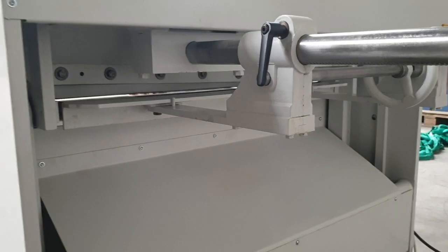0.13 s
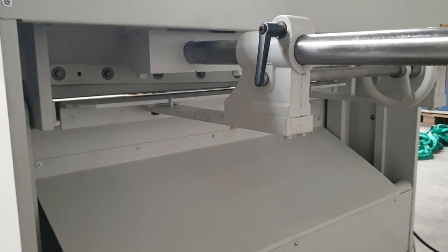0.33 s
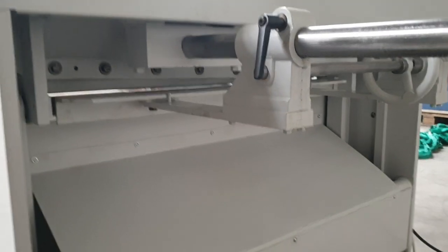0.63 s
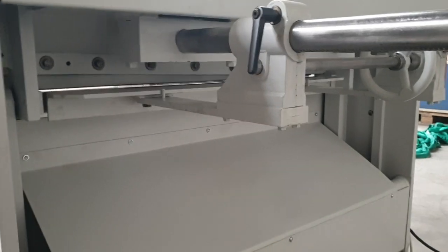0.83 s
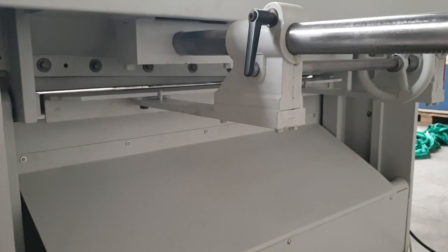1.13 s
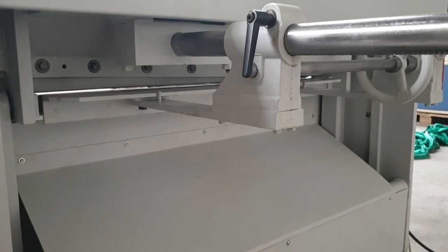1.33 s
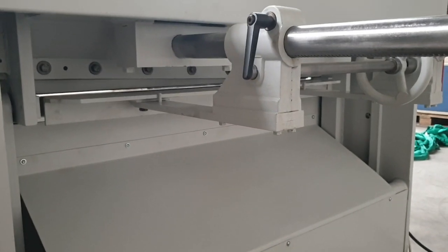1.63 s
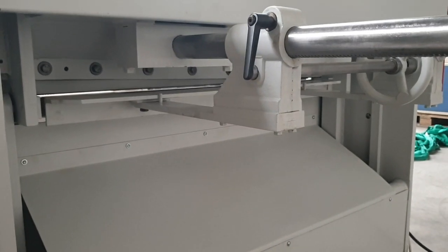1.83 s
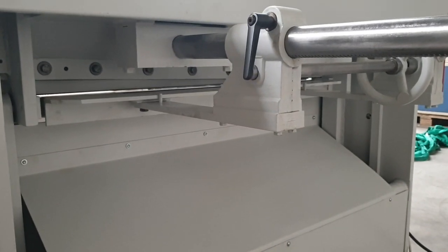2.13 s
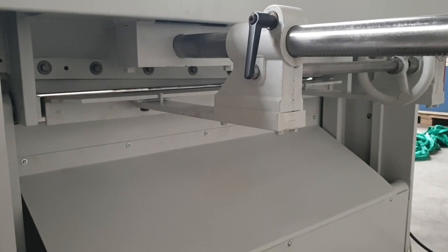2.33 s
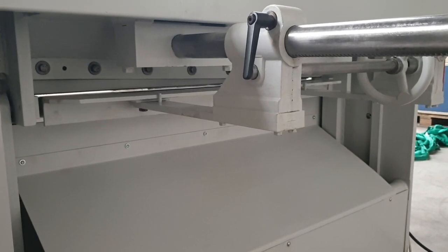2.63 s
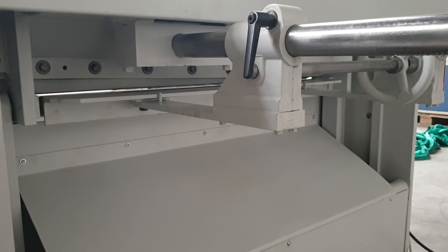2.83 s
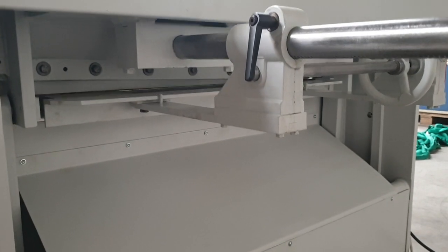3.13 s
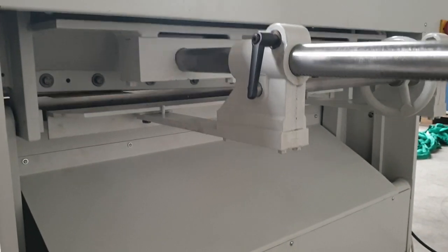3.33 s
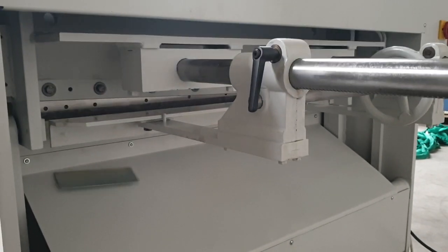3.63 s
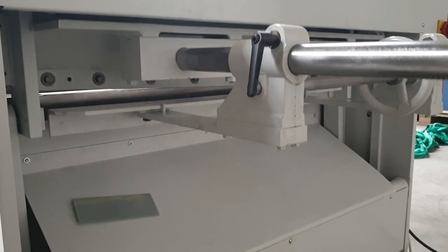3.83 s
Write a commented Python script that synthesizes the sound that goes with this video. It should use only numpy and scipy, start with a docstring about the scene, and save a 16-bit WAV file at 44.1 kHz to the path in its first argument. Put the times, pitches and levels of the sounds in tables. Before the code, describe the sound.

A metal shear idles with a low rumble and wavering hum in a workshop, clicks faintly, then cuts with a loud bang and heavy thuds; a steel strip clatters and slides on the chute, heard close in stereo.

```python
"""Sheet metal shear cutting a strip

A metal shear idles in a workshop, clicks, then cuts with a sharp bang of noise and low frame thuds.
The strip drops on the chute and bounces: decaying tones for its ring, noise for its clash; then it slides.
The microphone is close. The bang and the strip have most of their top treble on the left."""
import sys
import numpy as np
from scipy import signal
from scipy.fft import rfft, irfft
from scipy.io import wavfile

SR = 44100
rng = np.random.default_rng(int(sys.argv[2]) if len(sys.argv) > 2 else 0)


def to_wav(s):
    """Save 16-bit WAV."""
    ch = np.atleast_2d(s).T  # columns
    pcm = np.round(np.clip(ch, -1, 1) * 32767)  # PCM
    wavfile.write(sys.argv[1], SR, pcm.astype(np.int16))


N = 176400  # length of the scene in samples
T = np.arange(SR) / SR  # one second of time, for the single sounds

# Where each pitch sits between the sides. Each row: pitch in Hz, left minus right in dB.
PAN = [(80, 0), (1000, -4), (2000, -7.5), (4000, -4.5), (5500, -2), (7000, 18.5), (11000, 20), (13000, 0.5),
       (15000, 20)]
# Tone of metal touching metal. Each row: pitch in Hz, clash in dB per Hz, chute in dB per Hz.
CONTACT = [(100, -49, -21.5), (587, 0.5, 0), (1060, -20, -9), (1330, -22, 0), (1990, 2, 1.5),
           (3130, -2, -3), (5200, 4, -8.5), (7530, -9, -21), (9970, 1, -24), (13400, -2, -42),
           (16600, -23, -48)]
# t60 is the time in which a sound fades by 60 dB.
CLASH_T60_S = 0.2
MODE_GAP_HZ = 110.8  # average spacing of the strip's weaker modes; the chute's lie twice as close


def amp(db):
    """Turns decibels into a gain."""
    return 10 ** (np.asarray(db) / 20)


def unit(x):
    """Scales a signal to an rms of 1."""
    return x / np.sqrt(np.mean(x ** 2) + 1e-20)


def read(table, hz, axis=1):
    """Reads one column of a table between its rows, along log frequency."""
    table = np.array(table)
    return np.interp(np.log(hz + 1), np.log(table[:, 0] + 1), table[:, axis])


def sides(pan_db):
    """Gives the left and right gains for a left minus right difference in dB."""
    return amp(np.array([pan_db, -pan_db]).reshape(2, -1) / 2)


def fade(t60):
    """One second of exponential decay, as of a freely ringing body."""
    return np.exp(-np.log(1000) * T / t60)


def swell(peak_s):
    """A rounded rise to 1 and a longer fall, as of a heavy body pushed into motion."""
    return T / peak_s * np.exp(1 - T / peak_s)


def add(mix, s, sound):
    """Mixes a sound in at a time in seconds."""
    part = mix[:, round(s * SR):][:, :sound.shape[-1]]
    part += sound[..., :part.shape[1]]


def colour(x, table, axis=1, pan=PAN):
    """Gives two unrelated signals a spectrum, rms 1, then places each pitch between the sides."""
    # Likeness of the two sides. Each row: pitch in Hz, likeness from 0 to 1.
    likeness = [(100, 0.86), (500, 0.83), (1500, 0)]
    hz = np.fft.rfftfreq(x.shape[1], 1 / SR)
    a, b = rfft(x)
    same = np.clip(read(likeness, hz), 0, 1)
    pair = np.array([a, same * a + np.sqrt(1 - same ** 2) * b])
    shaped = pair * amp(read(table, hz, axis))
    return irfft(shaped * sides(read(pan, hz))) / irfft(shaped).std()


def noise(table, axis=1):
    """One second of coloured noise, like countless overlapping modes."""
    return colour(rng.standard_normal((2, SR)), table, axis)


def narrow(hz, width_hz):
    """A wavering band of noise around one pitch; around 0 Hz it is a random wobble."""
    f = np.fft.rfftfreq(N, 1 / SR)
    band = 1 / (1 + (2 * (f - hz) / width_hz) ** 4)
    return unit(irfft(rfft(rng.standard_normal(N)) * band, N))


def weak_modes(present, axis):
    """The many weaker modes of a plate: scattered pitches driven unevenly, anew each time."""
    spread_db = 4
    push = amp(spread_db * rng.standard_normal(len(present)))
    push = push * np.exp(2j * np.pi * rng.random((2, len(present))))
    return colour(irfft(present * push, SR), CONTACT, axis)


def workshop():
    """Noise rumble, the hum, drone and passing whine of the idling machine, and a faint hiss at first."""
    # Rumble of the room. Each row: pitch in Hz, level in dB per Hz.
    rumble_tone = [(15, -38), (25, -15), (59, -10), (80, -5), (117, -12), (134, -18), (212, -9.5),
                   (277, -18), (607, -33), (911, -26), (1190, -39), (1890, -39), (6740, -61.5),
                   (16000, -49.5)]
    # How the idling hum rises and falls. Each row: time in seconds, level in dB.
    hum_levels = [(.28, -68), (.38, -52), (.68, -60.5), (.8, -48), (1.02, -52), (1.26, -59.5),
                  (1.36, -50.5), (1.7, -73), (2.5, -65), (2.68, -50.5), (2.9, -70)]
    # Equal on both sides. Each row: pitch in Hz, left minus right in dB.
    centre = [(1, 0)]
    start_s, rise_s = 0.065, 0.0032
    air_db, growth_db_per_s = -55, 3.5
    hum_hz = 68.9
    drone_hz, drone_width_hz, drone_db = 209.4, 23.5, -63.5
    hiss_db, hiss_end_s = -68.5, 0.3
    whine_s, whine_length_s, whine_hz, whine_db = 0.66, 0.51, 1852, -85  # timed at its middle
    t = np.arange(N) / SR

    air = colour(rng.standard_normal((2, N)), rumble_tone, pan=centre)
    mids = signal.sosfilt(signal.butter(1, [300, 3500], "band", fs=SR, output="sos"), air)
    # The midrange grows slowly, then holds from 2.6 s.
    air = air + mids * (amp(growth_db_per_s * (np.minimum(t, 2.6) - 2.5)) - 1)

    hum = np.sqrt(2) * np.sin(2 * np.pi * hum_hz * t) + 0.27 * narrow(hum_hz, 20)
    hum = hum * amp(np.interp(t, *np.transpose(hum_levels)))
    drone = amp(drone_db) * narrow(drone_hz, drone_width_hz) * sides(-6.0)
    # The hiss fades from the start, and much faster after its end time.
    hiss_fall_db = 25 * t + 81 * np.maximum(t - hiss_end_s, 0)
    hiss = colour(rng.standard_normal((2, N)), CONTACT, pan=centre) * amp(hiss_db - hiss_fall_db)
    whine = amp(whine_db) * narrow(whine_hz, 130) / (1 + (2 * (t - whine_s) / whine_length_s) ** 4)
    return (amp(air_db) * air + hum + drone + hiss + whine) * np.clip((t - start_s) / rise_s, 0, 1)


def trigger():
    """Small clicks in the drive as the stroke begins: fading noise, dulled by a low-pass filter."""
    # Clicks just before the cut. Each row: start in seconds, level in dB before the dulling.
    click_list = [(3.02, -59), (3.088, -39)]
    out = np.zeros((2, N))
    for s, db in click_list:
        add(out, s, amp(db) * noise(CONTACT, axis=2) * fade(0.25))
    return signal.lfilter(*signal.butter(2, 1900, fs=SR), out)


def frame():
    """The heavy frame thuds in low swelling tones and shudders in rumbling noise."""
    # Thuds. Each row: start in seconds, pitch in Hz, level in dB, time to peak in seconds.
    thud_list = [(3.113, 298, -30, 0.011), (3.132, 82.6, -29, 0.015), (3.221, 111, -24, 0.0088),
                 (3.223, 222, -19, 0.024), (3.447, 75, -18.5, 0.01), (3.497, 75, -19.5, 0.0089),
                 (3.497, 190, -20.5, 0.0096), (3.542, 111.6, -24, 0.0117), (3.632, 106, -29, 0.029)]
    # Shudders as the ram moves. Each row: start in seconds, level in dB.
    shudder_list = [(3.09, -37), (3.217, -26), (3.436, -28.5), (3.885, -35)]
    # Tone of a shudder. Each row: pitch in Hz, level in dB per Hz.
    shudder_tone = [(28, -28), (66, 0.5), (230, -2), (330, -4), (450, -12.5), (900, -14.5), (4000, -85)]
    shudder_t60_s, shudder_rise_s = 1.5, 0.0018
    out = np.zeros((2, N))
    for s, hz, db, peak_s in thud_list:
        thud = swell(peak_s) ** 2 * np.sin(2 * np.pi * hz * T)
        add(out, s, amp(db) * thud * sides(-2.2))
    for s, db in shudder_list:
        shudder = noise(shudder_tone) * np.minimum(T / shudder_rise_s, 1) * fade(shudder_t60_s)
        add(out, s, amp(db) * shudder)
    return out


def blade():
    """The sheet tears and snaps in short noise; the machine rings on, longest in the bass."""
    # Blows of the blade and its drive. Each row: start in seconds, crack in dB, machine ring in dB.
    blow_list = [(3.1051, -13.5, -27), (3.4369, -52, -33.5)]
    # Tone of a blow. Each row: pitch in Hz, crack in dB per Hz, machine ring in dB per Hz.
    blow_tone = [(100, -32, -7), (925, -33, -1), (1640, -10, -6.5), (2830, 5, -11.5), (4380, 9, -6),
                 (6380, -4.5, -20.5), (8700, -11.5, -27.5), (10960, 0, -16), (16400, -23, -40)]
    ring_t60_s, ring_dull_hz = 1.47, 11000  # bass fade time; pitch at which the ring lasts half as long
    crack_t60_s, snap_t60_s = 0.16, 0.0058
    tear_db, tear_hz = -0.5, 500  # depth and speed of the grain of tearing steel
    hz = np.fft.rfftfreq(512, 1 / SR)
    out = np.zeros((2, N))
    for s, crack_db, ring_db in blow_list:
        # Cut the noise into short spectra, so that each pitch can fade at its own rate.
        _, t, spectra = signal.stft(noise(blow_tone, axis=2), SR, nperseg=512)
        decay = np.exp(-np.log(1000) * t / ring_t60_s * (1 + hz[:, None] / ring_dull_hz))
        ring = signal.istft(spectra * decay, nperseg=512)[1][:, :SR]
        grain = amp(tear_db * narrow(0, tear_hz)[:SR])
        crack = noise(blow_tone) * (fade(crack_t60_s) * grain + fade(snap_t60_s))
        add(out, s, amp(crack_db) * crack + amp(ring_db) * ring)
    return out


def strip():
    """Each bounce damps the old ringing, then rings strip and chute anew with a short clash."""
    # Hits on the chute. Each row: start in seconds, strip ring in dB, clash in dB, chute in dB,
    # how it lands from 0 (edge) to 1 (face), pitch in Hz of the mode driven hardest.
    # Clash and chute are halved once more below.
    hit_list = [(3.4888, -31.5, -12.5, -36, 0, 2638), (3.506, -25, -25, -16.5, 0, 965),
                (3.5131, -24, -14, -40, 0.32, 10300), (3.531, -25, -15.5, -25, 0.11, 11962),
                (3.553, -25.5, -17, -26.5, 0.24, 2638), (3.6209, -28.5, -41, -11.5, 0.3, 1326),
                (3.6512, -26.5, -34, -12.5, 0.25, 3370), (3.675, -43, -44, -16, 0.31, 5520),
                (3.6927, -29.5, -14.5, -26, 1, 4506), (3.699, -28.5, -11.5, -15.5, 0.55, 1326),
                (3.713, -27, -10, -14, 0.94, 9697), (3.7239, -24.5, -24, -26, 0.98, 5157),
                (3.806, -40, -49, -45.5, 0.22, 9162), (3.8543, -24.5, -13.5, -28, 0.82, 9697),
                (3.887, -33, -12, -17.5, 0.93, 5410), (3.9112, -31, -19.5, -43, 1, 4506),
                (3.9721, -33, -16.5, -32, 0.61, 5157), (3.9795, -36.5, -13.5, -49, 0.93, 10300)]
    # Modes of the strip, three lists: pitch in Hz, level in dB struck on its edge, the same on its face.
    mode_hz = [642, 965, 1326, 1715, 2638, 2972, 3370, 4506, 5157, 5243, 5410, 5520, 5838, 6382, 9162, 9697,
               10300, 10444, 11064, 11962]
    mode_edge_db = [-24, -1, -2, -6.5, -9, -3, -0.5, -14, -15, 4.5, -2.5, -18, -13, -14, -26, -14, -16,
                    -7.5, 4.5, -3]
    mode_face_db = [-6.5, -13, -16.5, -14, -5.5, -6, -11.5, 0.5, 5.5, -1, -5, -12, -0.5, 2.5, -5, -2, 0,
                    -21, -26, -29]
    # A corner of the strip knocks the chute. Each row: start in seconds, pitch in Hz, level in dB.
    knock_list = [(3.6219, 1493, -11), (3.629, 903, -17), (3.8533, 1704, -20), (3.8864, 1947, -13.5)]
    t60_1khz_s, damping = 0.6, 0.45  # fade time at 1 kHz, and how strongly it falls with pitch
    choke_db, hardest_db, hit_spread_db = 4.5, 5, 3.5  # damping; hardest mode's level; change per hit
    twin_db, twin_gap_hz = -7, 26.1  # each mode of the bent strip beats with a close twin
    tick_db, tick_t60_s = -1.5, 0.075  # relative to the clash
    chute_t60_s, thump_db, thump_t60_s = 0.35, -3, 0.014  # the thump is relative to the chute
    knock_peak_s, rattle_hz = 0.0022, 705
    out = np.zeros((2, N))

    hz, edge_db, face_db = np.array([mode_hz, mode_edge_db, mode_face_db])
    count = len(hz)
    t60 = t60_1khz_s * (hz / 1000) ** -damping
    modes = np.exp(2j * np.pi * hz[:, None] * T) * fade(t60[:, None])
    paths = sides(read(PAN, hz)) * np.exp(2j * np.pi * rng.random((2, count)))
    # Pick at random which pitches, 1 Hz apart, are weaker modes of the strip and of the chute.
    in_strip, in_chute = rng.random((2, SR // 2 + 1)) * MODE_GAP_HZ < np.array([[1], [2]])

    for s, ring_db, clash_db, chute_db, face, hardest_hz in hit_list:
        out[:, round(s * SR):] *= amp(-choke_db)
        push_db = edge_db + np.clip(face, 0, 1) * (face_db - edge_db)
        push = amp(push_db + hit_spread_db * rng.standard_normal(count))
        push[np.argmin(abs(hz - hardest_hz))] = amp(hardest_db)
        beat_turns = twin_gap_hz * rng.standard_normal((count, 1)) * T + rng.random((count, 1))
        twins = amp(twin_db) * np.exp(2j * np.pi * beat_turns)
        ring = ((paths * push) @ (modes * (1 + twins))).real

        clash = weak_modes(in_strip, axis=1) * fade(CLASH_T60_S)
        clash = clash + amp(tick_db) * noise(CONTACT) * fade(tick_t60_s)
        chute = weak_modes(in_chute, axis=2) * fade(chute_t60_s)
        chute = chute + amp(thump_db) * noise(CONTACT, axis=2) * fade(thump_t60_s)
        add(out, s, amp(ring_db) * ring + (amp(clash_db) * clash + amp(chute_db) * chute) / 2)

    for s, pitch_hz, db in knock_list:
        # A random wobble of the phase roughens the tone into a rattle.
        knock = np.sin(2 * np.pi * pitch_hz * T + narrow(0, rattle_hz)[:SR])
        add(out, s, amp(db) * swell(knock_peak_s) * knock * sides(read(PAN, pitch_hz)))
    return out


def slide():
    """Tiny random catches of the sliding strip rub the chute and keep the strip shimmering."""
    start_s, rise_s, grains_per_s = 3.73, 0.059, 1100
    rub_db, shimmer_db = -35.5, -37
    grains = rng.standard_normal((2, N)) * (rng.random(N) < grains_per_s / SR)
    present = rng.random(SR // 2 + 1) * MODE_GAP_HZ < 2
    body = weak_modes(present, axis=1) * fade(CLASH_T60_S)
    shimmer = unit(signal.fftconvolve(grains, body, axes=1)[:, :N])
    rub = colour(grains, CONTACT, axis=2)
    sliding = amp(rub_db) * rub + amp(shimmer_db) * shimmer
    return sliding * np.clip((np.arange(N) / SR - start_s) / rise_s, 0, 1)


def room(x):
    """Many mixed echoes: a diffuse tail of fading noise, duller than the direct sound."""
    t60_s, rise_s = 0.76, 0.011
    dull = signal.lfilter([1], [1, -.5], rng.standard_normal((2, SR)))
    tail = dull * fade(t60_s) * np.minimum(T / rise_s, 1)
    return signal.fftconvolve(x, tail / np.linalg.norm(tail[0]), axes=1)[:, :N]


def scene():
    """The machine and the falling strip in the workshop; only the strip gets the room tail."""
    room_db = -12
    steel = strip() + slide()
    return workshop() + trigger() + frame() + blade() + steel + amp(room_db) * room(steel)


def record(dry):
    """Overload flattens peaks at full scale; then a filter removes the sound above its edge."""
    edge_hz = 16100
    low_pass = signal.firwin(255, edge_hz, window=("kaiser", 8), fs=SR)
    return signal.oaconvolve(np.clip(dry, -1, 1), low_pass[None], "same")


dry = scene()
out = record(dry)
to_wav(out)
```